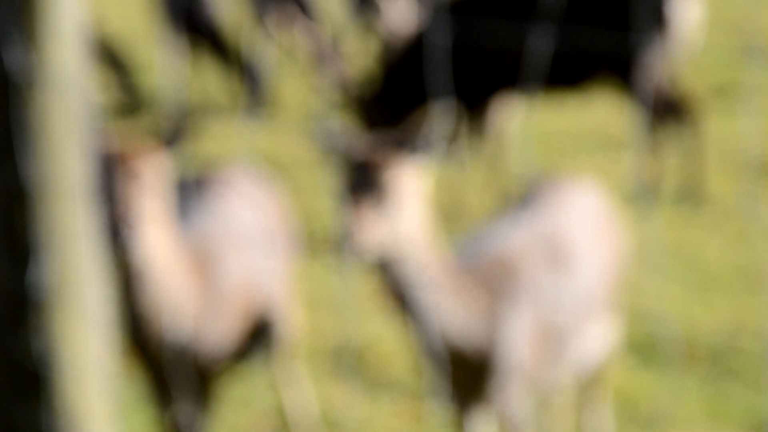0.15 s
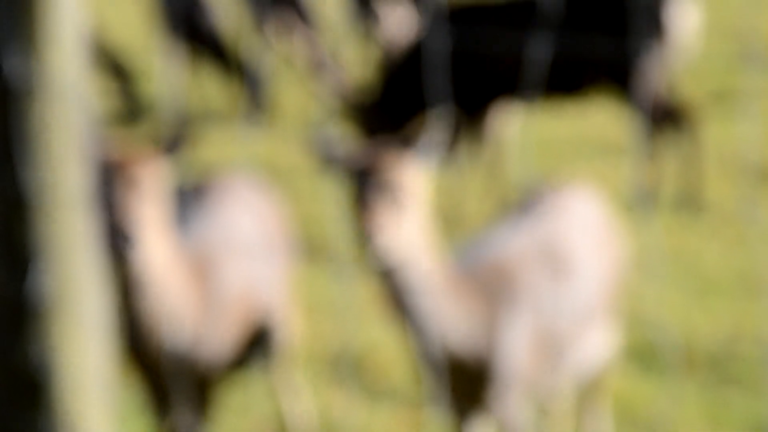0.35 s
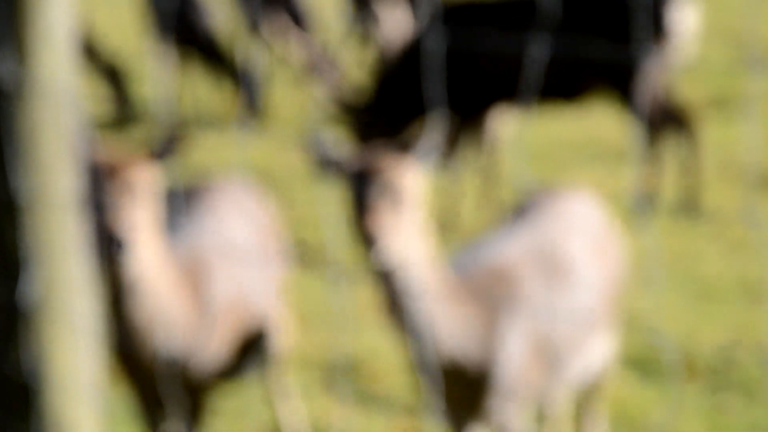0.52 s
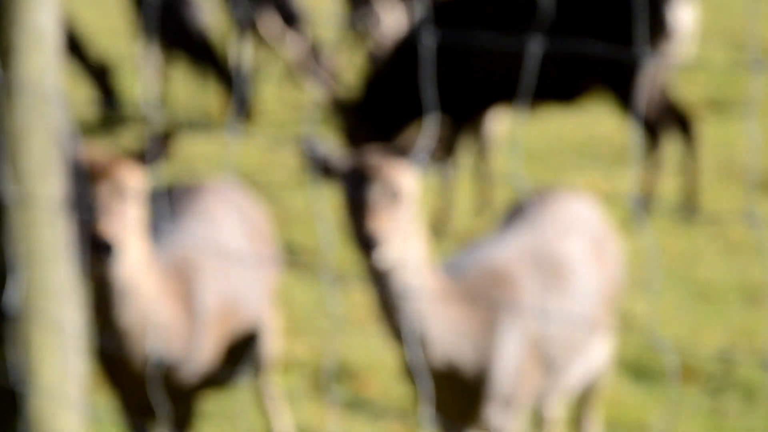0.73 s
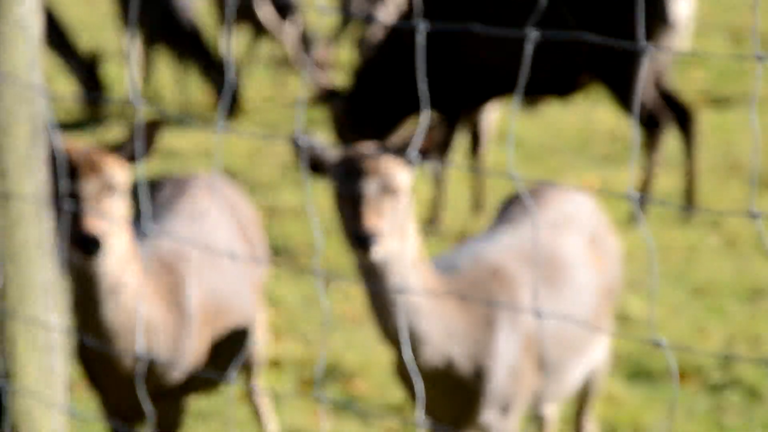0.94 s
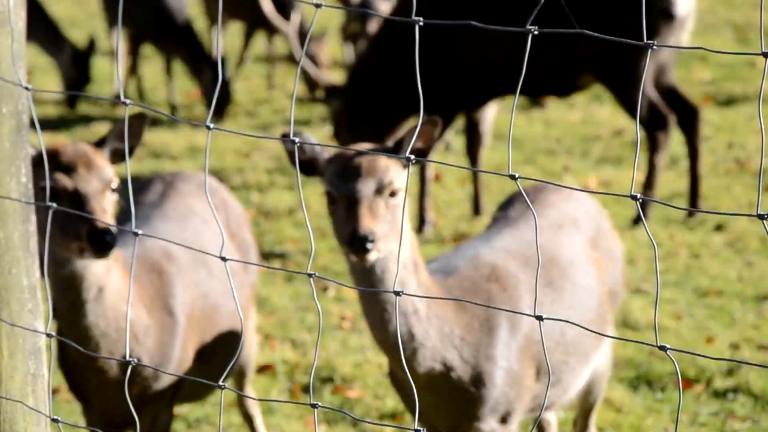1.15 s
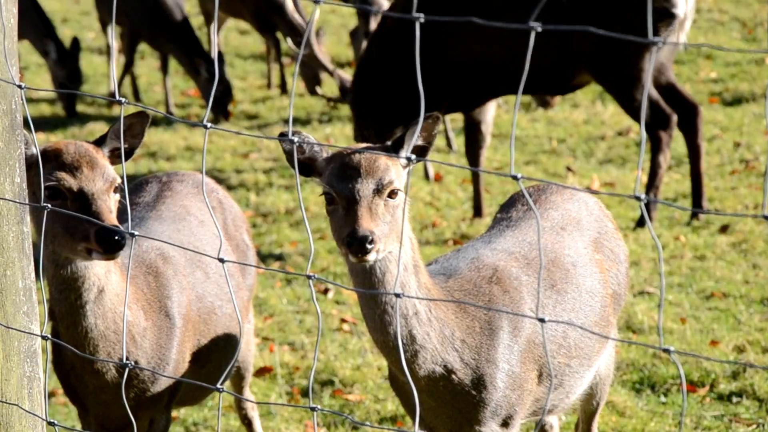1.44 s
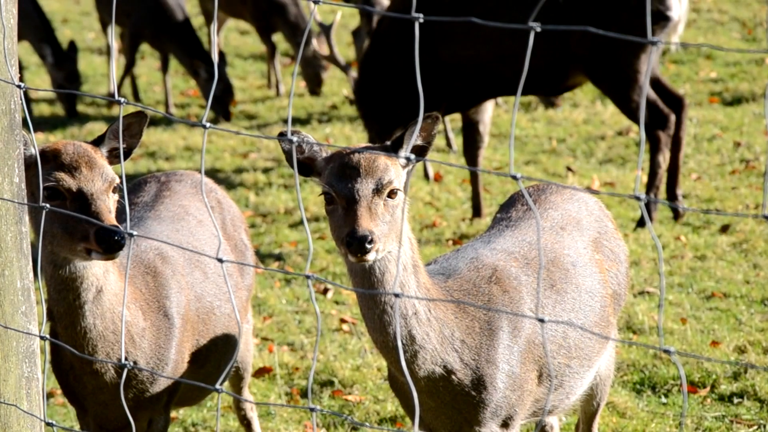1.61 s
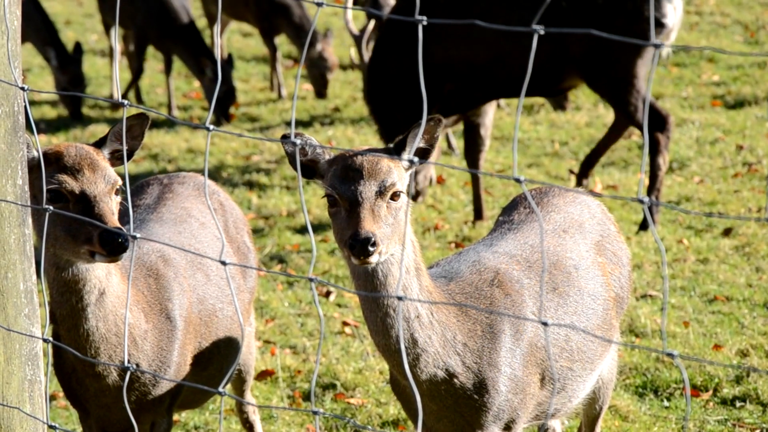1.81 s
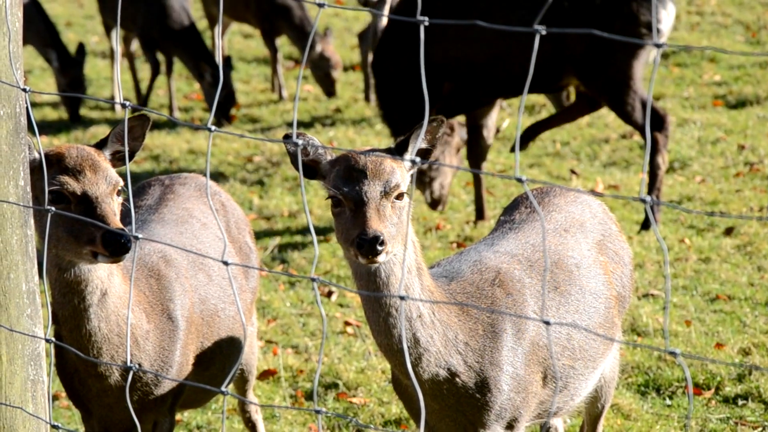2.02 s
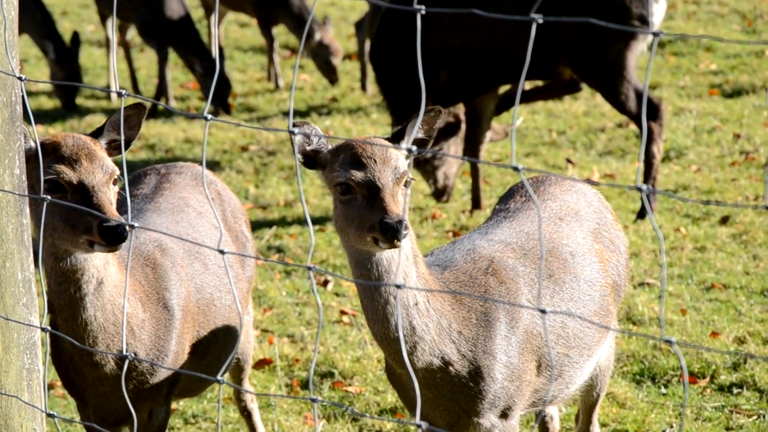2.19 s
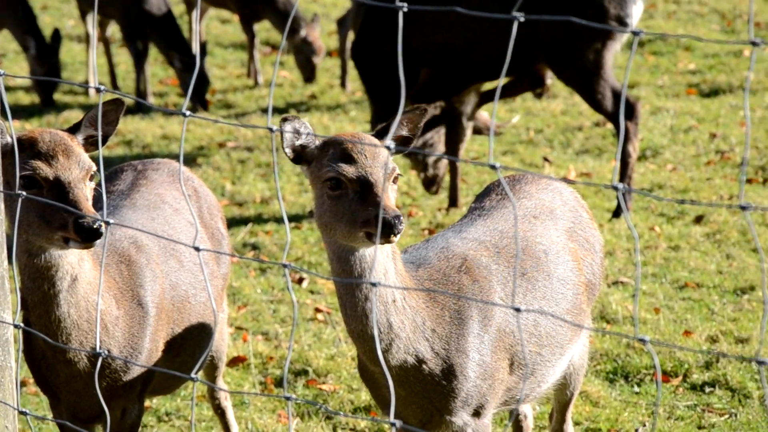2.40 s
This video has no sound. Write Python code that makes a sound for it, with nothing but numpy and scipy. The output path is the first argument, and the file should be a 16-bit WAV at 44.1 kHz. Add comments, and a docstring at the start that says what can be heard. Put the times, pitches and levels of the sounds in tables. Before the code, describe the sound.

A lens autofocus motor stutters very close up: brief ticks, a dense run of sharp plastic-metallic clacks with gear rattle and tiny squeaks, a few late clicks, then only soft steady outdoor hiss.

```python
"""Camera focus motor hunting

A camera's autofocus motor hunts for focus right beside the built-in microphone, over a faint outdoor hiss.
Short pulses on a 3 ms clock drive it: each step is a light tick, then a hard clack as the lens stops.
The blows ring in the lens barrel and camera body, and loose gears rattle in filtered noise.
Slow nudges buzz at the clock rate and scrape; the slide rubs and squeaks faintly, with two thin whistles,
and two faint taps are short bursts of dull noise."""
import sys
import numpy as np
from scipy import signal
from scipy.fft import rfft, irfft
from scipy.io import wavfile
from scipy.ndimage import uniform_filter1d

SR = 44100
rng = np.random.default_rng(int(sys.argv[2]) if len(sys.argv) > 2 else 0)


def output_pcm(signal):
    """Save a mono or channel-first signal as 16-bit PCM at the path in sys.argv[1].

    Samples are clipped to [-1, 1] before scaling.
    """
    pcm = np.clip(np.atleast_2d(signal).T, -1, 1) * 32767
    wavfile.write(sys.argv[1], SR, np.round(pcm).astype(np.int16))


N = 112454
TIME = np.arange(N) / SR

# tone colour of the outdoor hiss: (frequency [Hz], level [dB])
HISS_COLOUR = [(15, -38), (25, -39), (59, -10), (149, -11), (288, -7.5), (327, -10.5), (391, -10),
               (559, -7.5), (651, -7), (954, -4), (1080, -3), (1360, -4.5), (3680, -13), (7130, -27),
               (7900, -35.5), (9200, -31), (11000, -46), (14300, -96), (22000, -120)]
# faint handling taps: (time [s], level [dB])
TAPS = [(.1432, -38.5), (1.9879, -38.5)]
# tone colour of the taps: (frequency [Hz], level [dB])
TAP_COLOUR = [(200, -28), (600, -4), (1100, 4.5), (3500, -7.5), (5000, -9), (9000, -47)]
# loudness of the lens rubbing on its slide: (time [s], level [dB])
FRICTION = [(.16, -72), (.2, -55), (.33, -58), (.4, -50), (.47, -51), (.62, -47), (.78, -57), (.9, -73),
            (1.1, -54.5), (1.2, -50.5), (1.36, -56), (1.41, -62), (1.66, -61), (1.72, -78)]
# tone colour of that rubbing: (frequency [Hz], level [dB])
SLIDE_COLOUR = [(200, -13.5), (500, 0.5), (1400, -1), (2600, 6.5), (4200, -3), (5500, -0.5), (7000, -8.5),
                (9000, -15), (10700, -22)]
# short gliding tones: squeaks of the slide, and two faint thin whistles above 10 kHz:
# (time [s], length [s], start pitch [Hz], end pitch [Hz], level [dB])
GLIDES = [(0.41, 0.0076, 7400, 5700, -48), (.422, 0.01, 4300, 4000, -42), (.436, .012, 5100, 4960, -48),
          (0.615, 0.014, 10500, 11000, -49), (0.823, 0.0094, 3750, 3300, -38),
          (0.895, 0.0174, 3670, 4100, -42.5), (1.184, .006, 10300, 10500, -50),
          (1.209, .017, 4120, 4850, -43)]
# slow nudges of the lens: (start [s], stop [s], pulse level [dB], scrape level [dB])
NUDGES = [(0.2263, 0.248, -1, -41.5), (.351, 0.382, -0.5, -36), (1.4272, 1.4596, 1, -40),
          (1.601, 1.636, -0.5, -42.5)]
# tone colour of a drive tick against a clack: (frequency [Hz], level [dB])
TICK_COLOUR = [(800, 0.5), (1900, 7.5), (2500, -1.5), (3700, -3), (4700, -8.5), (5900, 0.5), (6450, 7),
               (6750, 13), (7300, 13), (7700, 5), (8400, 11), (9200, 6), (9800, 8), (10700, 2)]
# short ringing tones of the lens barrel: (frequency [Hz], level [dB], time to fall 60 dB [s])
BARREL_MODES = [(800, -43.5, 0.043), (1456, -44, 0.038), (2535, -25.5, 0.013), (2700, -45, 0.015),
                (2810, -48, 0.071), (3706, -14.5, 0.018), (3701, -19, 0.023), (4160, -37, 0.029),
                (5072, -25.5, 0.018), (4887, -27, 0.02), (5357, -24, 0.0075), (5955, -25, 0.0086),
                (6690, -43.5, 0.011), (7136, -38, 0.0069), (8510, -49, 0.014), (9060, -44, 0.012)]
# mostly longer, weaker tones of the camera body: (frequency [Hz], level [dB], time to fall 60 dB [s])
CAMERA_MODES = [(567, -56, 0.035), (815, -53, 0.033), (1427, -42, 0.053), (1727, -45.5, 0.037),
                (2012, -48, 0.027), (2376, -51, 0.063), (2556, -42.5, 0.036), (3628, -42, 0.046),
                (4876, -56, .04), (5330, -65, 0.031), (5970, -45, 0.027), (7600, -57, 0.025),
                (10650, -55, 0.017)]
# tone colour of the gears' rattle and scrape: (frequency [Hz], level [dB])
GEAR_COLOUR = [(150, -22.5), (500, -11), (680, -11.5), (830, -5), (1100, -12.5), (1420, -1), (2150, -6.5),
               (2560, 4), (3200, -3), (3650, -3.5), (4500, -5.5), (5000, -2), (5900, -3.5), (6450, -16.5),
               (7250, -13), (7700, -23), (9100, -21.5), (9900, -33), (10700, -19)]
# focus steps, before rounding to the clock: (clack time [s], relative level [dB], lead of the tick [s])
STEPS = [(0.30924, 0, 0.0055), (0.48668, 0, 0.0035), (0.4987, 0, 0.006), (0.51371, -2, 0.006),
         (0.52877, -1, 0.006), (0.54677, -2, 0.0065), (0.56183, -2, 0.006), (0.57684, -1.6, 0.006),
         (0.59487, -1.5, 0.006), (0.61591, -1.5, 0.006), (0.63394, -1.8, 0.0058), (0.65795, -3.5, 0.0058),
         (0.67899, -1, 0.0062), (0.697, -1.7, 0.0032), (0.71203, -3, 0.0072), (0.72709, -1.3, 0.0032),
         (0.7421, -2.8, 0.0064), (0.76312, -2.2, 0.0065), (0.78115, -2, 0.0062), (0.80219, -2.3, 0.003),
         (0.82022, -2.7, 0.006), (0.84126, -2.5, 0.0033), (0.85328, -2, 0.0034), (0.8653, -1.5, 0.0026),
         (0.88031, -1.5, 0.006), (0.90734, -1.1, 0.0032), (0.92237, -3, 0.0034), (0.94341, -1.1, 0.0063),
         (0.96444, -2.7, 0.0063), (0.98847, -1.6, 0.006), (1.0155, -3, 0.0054), (1.03954, -1, 0.006),
         (1.06659, -2, 0.0063), (1.09963, -3, 0.006), (1.12366, -2.5, 0.003), (1.14169, -3, 0.0032),
         (1.16573, -2.8, 0.0032), (1.23185, -2.7, 0.003), (1.24988, -1.3, 0.006), (1.26788, -2, 0.0063),
         (1.28591, -1, 0.006), (1.30695, -3.2, 0.0061), (1.328, -2.1, 0.006), (1.34902, -2.2, 0.006),
         (1.37004, -1.4, 0.006), (1.53239, -1.9, 0.0077), (1.6645, -0.8, 0.0076)]
# extra ticks: three about 3 ms after a clack made from rest, one on its own: (time [s], level [dB])
EXTRA_TICKS = [(0.3116, -8), (1.3847, -9), (1.535, -7.5), (1.667, -8)]

HISS_DB = -52
TAP_T60_S = 0.022  # a T60 is the time to fall 60 dB
GLIDE_WAVER_HZ = 330
CLOCK_S, CLOCK_START_S = 0.0030046, 0.4985
START_DB, STOP_DB, BUZZ_DB, SETTLE_DB = -10.5, -8, -12, -14.5  # parts of a nudge
SWELL_AT_S, SWELL_WIDTH_S, SETTLE_S = 0.013, 0.0047, 0.011
CAMERA_RISE_S = 0.0039  # the rise is 60 dB short of complete by then
RATTLE_DB, RATTLE_T60_S = -13.5, 0.04
SCRAPE_AT_S, SCRAPE_WIDTH_S, SCRAPE_GRAIN_DB = 0.016, 0.0046, 6
CLACK_DB, TICK_DB, STEP_SPREAD_DB = -0.5, -6, 0.76
REST_GAP_S, FROM_REST_DB = 0.1, -2.5
BOUNCE_S, BOUNCE_DB = 0.002, -13.5  # longest wait for the rebound, and its level
CUTOFF_HZ = 10950


def from_db(db):
    """Turn decibels into a plain multiplier."""
    return 10 ** (np.asarray(db) / 20)


def rms_one(x):
    """Scale a signal so its average strength (rms) is one."""
    return x / np.sqrt(np.mean(x ** 2) + 1e-20)


def colour(x, points):
    """Filter a sound to follow (Hz, dB) points, without any response before its cause."""
    hz, db = np.transpose(points)
    bin_hz = np.arange(N + 1) * SR / (2 * N)
    bin_db = np.interp(np.log(bin_hz + 1), np.log(hz), db)
    # folding the cepstrum (the log spectrum transformed back) puts all the response after the cause
    cepstrum = irfft(np.log(from_db(bin_db)))[:N]
    cepstrum[1:] *= 2
    response = np.exp(rfft(cepstrum, 2 * N))
    return irfft(rfft(x, 2 * N) * response)[:N]


def noise(points):
    """Make coloured noise with an rms of one."""
    return rms_one(colour(rng.standard_normal(N), points))


def smooth_random(samples):
    """Make a slowly wandering random signal with an rms of one, by averaging neighbours."""
    return rms_one(uniform_filter1d(rng.standard_normal(N), size=samples))


def decay(t60):
    """Make a level curve that falls 60 dB in t60 seconds."""
    return np.exp(-np.log(1000) * TIME / t60)


def bump(age, width):
    """Make a smooth bell-shaped rise and fall around age zero."""
    return np.exp(-0.5 * (age / width) ** 2)


def convolve(x, response):
    """Let every blow in x set off the same response."""
    return signal.fftconvolve(x, response)[:N]


def clicks(rows):
    """Make single-sample blows from (time in s, gain) rows."""
    times, gains = np.transpose(rows)
    return np.bincount(np.round(times * SR).astype(int), gains, N)[:N]


def on_clock(times):
    """Move times to the nearest beat of the drive clock."""
    beats = np.round((times - CLOCK_START_S) / CLOCK_S)
    return CLOCK_START_S + beats * CLOCK_S


def hiss():
    """The faint outdoor air is steady coloured noise."""
    return from_db(HISS_DB) * noise(HISS_COLOUR)


def taps():
    """Small dull taps on the camera are bursts of noise that die away quickly."""
    blows = clicks([(time, from_db(db)) for time, db in TAPS])
    return convolve(blows, decay(TAP_T60_S)) * noise(TAP_COLOUR)


def rubbing():
    """The moving lens rubs on its slide as soft noise of changing loudness."""
    return from_db(np.interp(TIME, *np.transpose(FRICTION))) * noise(SLIDE_COLOUR)


def nudges():
    """The motor gives a tick, a swell of clock-rate pulses, a stopping tick and a dying buzz."""
    rows = []
    age = CLOCK_S * np.arange(1, 10)  # nine pulses after each tick
    swell = from_db(BUZZ_DB) * bump(age - SWELL_AT_S, SWELL_WIDTH_S)
    settle = from_db(SETTLE_DB) * np.exp(-(age - CLOCK_S) / SETTLE_S)
    for start, stop, db, _ in NUDGES:
        for time, tick_db, buzz in ((start, START_DB, swell), (stop, STOP_DB, settle)):
            rows.append((time, from_db(db + tick_db)))
            rows.extend(zip(time + age, from_db(db) * buzz))
    return clicks(rows)


def ringing(modes):
    """One blow sets off fading tones; tones in neighbouring rows swing in opposite directions."""
    total = 0
    for k, (hz, db, t60) in enumerate(modes):
        tone = np.sin(2 * np.pi * hz * TIME)
        total = total + (-1) ** k * from_db(db) * decay(t60) * tone
    return total


def barrel(force):
    """Blows ring the lens barrel at once, while the camera body's ring builds up more slowly."""
    camera_ring = ringing(CAMERA_MODES) * (1 - decay(CAMERA_RISE_S))
    return convolve(force, ringing(BARREL_MODES) + camera_ring)


def rattle(force):
    """Loose gears chatter briefly after every jolt, as fresh noise each time."""
    power_fade = decay(RATTLE_T60_S) ** 2
    power = convolve(force ** 2, power_fade / power_fade.sum())
    return from_db(RATTLE_DB) * np.sqrt(np.abs(power)) * noise(GEAR_COLOUR)


def scrapes():
    """During each nudge the lens creeps forward with a short scrape, its loudness randomly grainy."""
    level = 0
    for start, _, _, db in NUDGES:
        level = level + from_db(db) * bump(TIME - start - SCRAPE_AT_S, SCRAPE_WIDTH_S)
    grain = rms_one(from_db(SCRAPE_GRAIN_DB * smooth_random(50)))
    return level * grain * noise(GEAR_COLOUR)


def steps():
    """Each step is a tick, then a clack with one small rebound; clacks are softer after a long rest."""
    times, db, lead = np.transpose(STEPS)
    beat = on_clock(times)
    gain = from_db(db + STEP_SPREAD_DB * rng.standard_normal(len(times)))
    ticks = clicks(np.c_[on_clock(beat - lead), gain * from_db(TICK_DB)])
    ticks = ticks + clicks([(time, from_db(level)) for time, level in EXTRA_TICKS])

    rested = np.diff(times, prepend=0) > REST_GAP_S
    clack_gain = gain * from_db(CLACK_DB + FROM_REST_DB * rested)
    bounce_time = beat + BOUNCE_S * rng.uniform(0.14, 1, len(times))
    bounces = clicks(np.c_[bounce_time, clack_gain * from_db(BOUNCE_DB)])
    return ticks, clicks(np.c_[beat, clack_gain]) + bounces


def glides():
    """Squeaks of the slide and two thin whistles are short tones with unsteady, gliding pitch."""
    sound = 0
    waver = GLIDE_WAVER_HZ * smooth_random(30)
    unevenness = np.sqrt(np.abs(smooth_random(120)))  # of the loudness
    for start, length, start_hz, end_hz, db in GLIDES:
        progress = np.clip((TIME - start) / length, 0, 1)
        hz = start_hz + (end_hz - start_hz) * progress + waver
        tone = np.sin(2 * np.pi * np.cumsum(hz) / SR)
        fade = np.sqrt(2 * np.abs(np.sin(np.pi * progress)))
        sound = sound + from_db(db) * unevenness * fade * tone
    return sound


def scene():
    """Add the focus motor, its slide, the whistles and the taps to the outdoor hiss."""
    step_ticks, clacks = steps()
    ticks = step_ticks + nudges()
    ring = barrel(clacks + colour(ticks, TICK_COLOUR))
    gears = rattle(clacks + 1.02 * ticks)
    mix = hiss() + taps() + rubbing() + ring + gears + scrapes() + glides()
    return mix[None]  # one channel


def record(dry):
    """Cut the highest frequencies steeply."""
    # 0.2 dB ripple below the cutoff, at least 70 dB down well above it
    low_pass = signal.ellip(10, 0.2, 70, CUTOFF_HZ, fs=SR, output="sos")
    return signal.sosfilt(low_pass, dry)


dry = scene()
out = record(dry)
output_pcm(out)
```